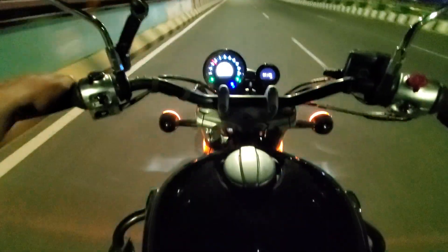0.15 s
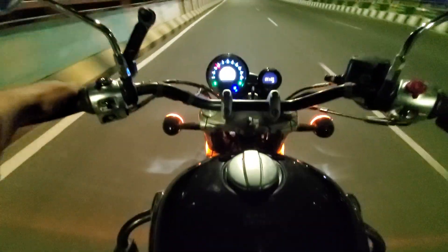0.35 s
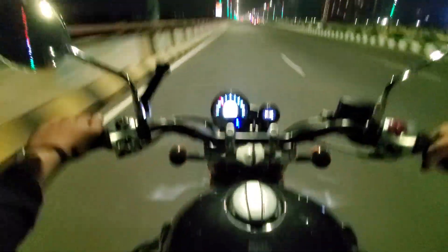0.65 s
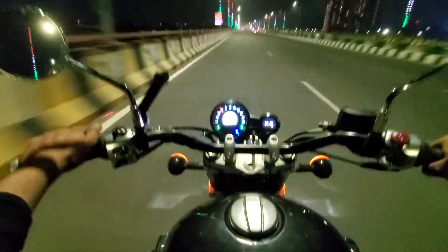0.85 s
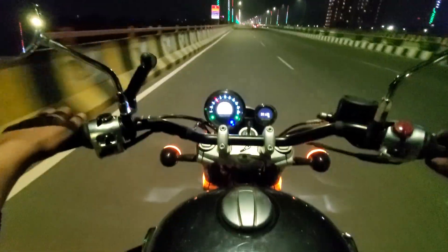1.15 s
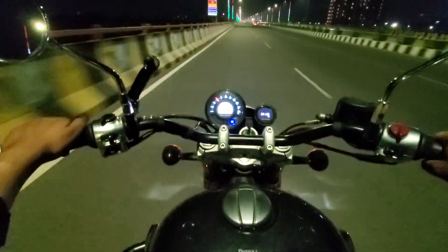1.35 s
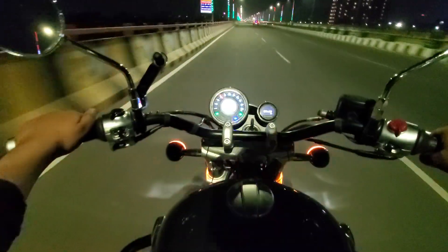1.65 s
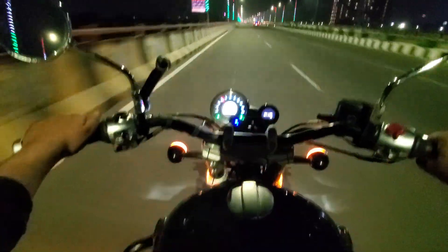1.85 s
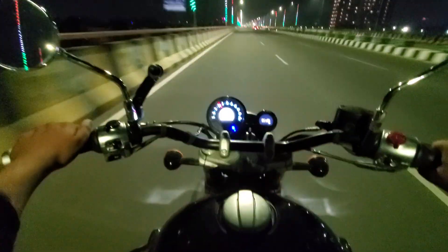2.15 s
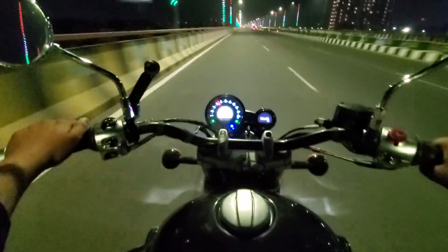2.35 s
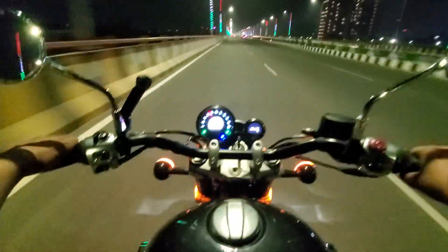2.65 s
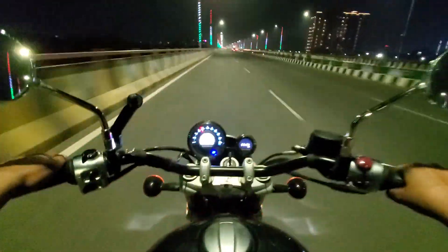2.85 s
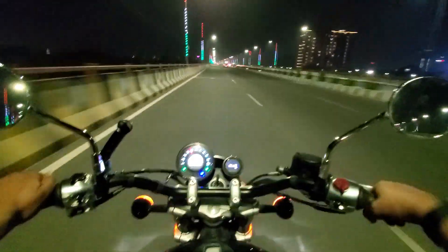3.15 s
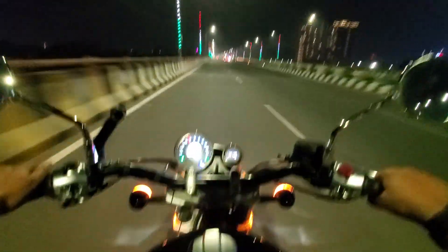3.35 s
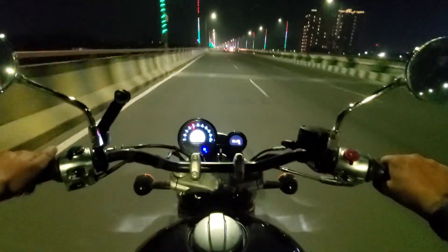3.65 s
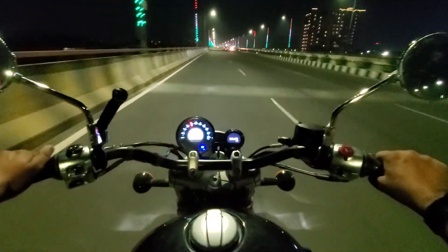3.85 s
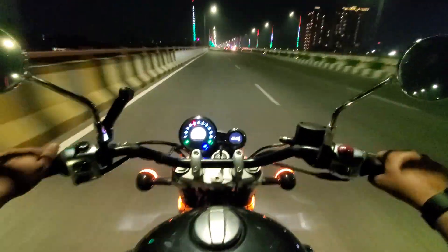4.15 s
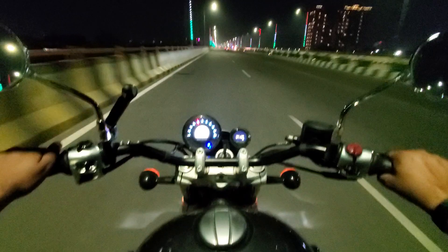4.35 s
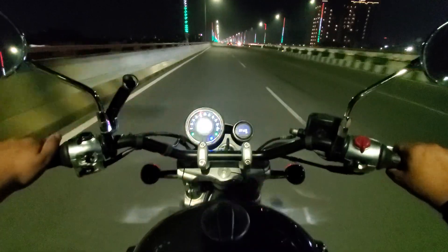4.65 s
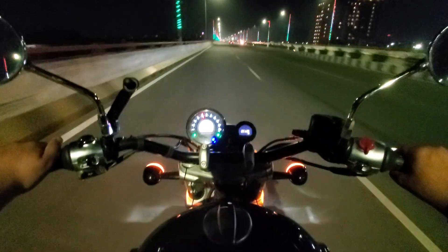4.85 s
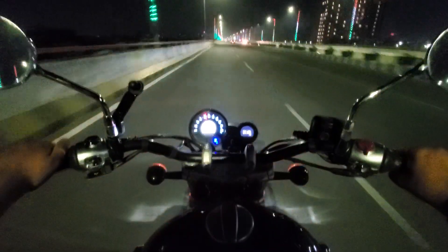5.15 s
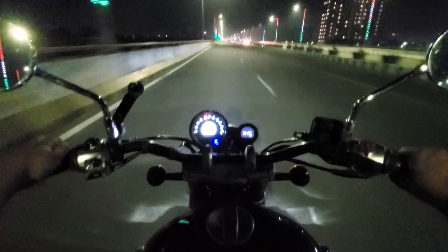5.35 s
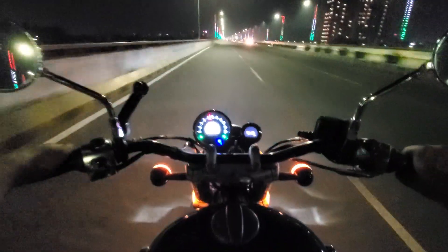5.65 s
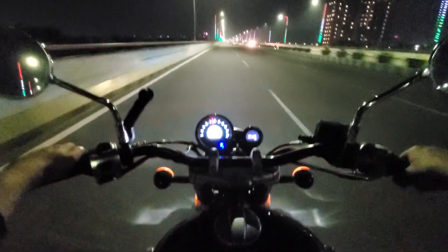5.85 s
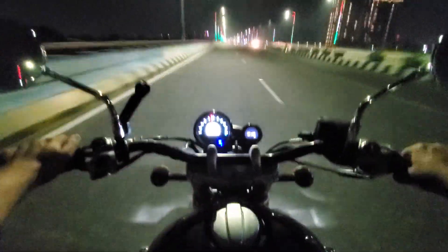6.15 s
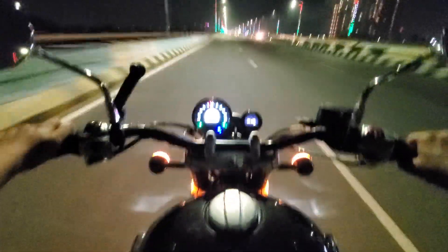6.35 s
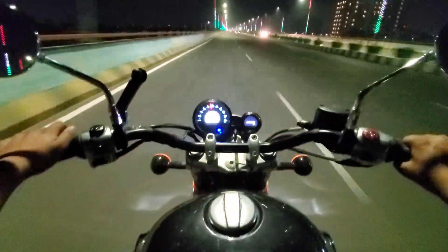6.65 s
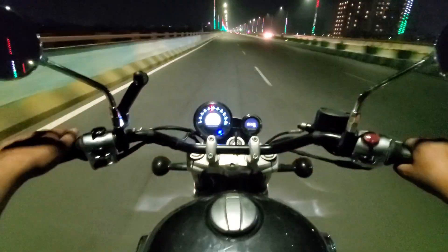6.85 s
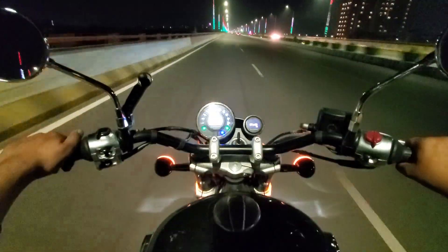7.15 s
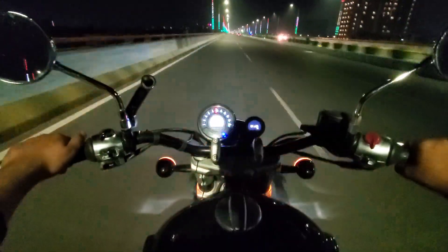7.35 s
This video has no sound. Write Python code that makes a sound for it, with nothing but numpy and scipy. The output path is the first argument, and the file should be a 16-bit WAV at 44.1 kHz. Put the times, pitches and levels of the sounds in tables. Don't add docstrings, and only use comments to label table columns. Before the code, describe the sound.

Hard motorcycle acceleration heard onboard: throaty uneven exhaust drone, three brief throttle cuts with small pops, gear whine and rising wind rumble.

```python
import sys
import numpy as np
from scipy import signal
from scipy.io import wavfile
from scipy.ndimage import uniform_filter1d

SR = 44100
rng = np.random.default_rng(int(sys.argv[2]) if len(sys.argv) > 2 else 0)


def store_pcm(level_fs):
    pcm = np.round(np.clip(level_fs, -1, 1) * 32767).astype(np.int16)
    wavfile.write(sys.argv[1], SR, np.atleast_2d(pcm).T)


def gain_from_db(level_db):
    decades = np.asarray(level_db, float) / 20
    return 10 ** decades


N = 330294


def evened(x):
    return x / np.sqrt(np.mean(x ** 2) + 1e-20)


def in_band(x, lo_hz, hi_hz):
    band_filter = signal.butter(4, [lo_hz, hi_hz], "bandpass", fs=SR, output="sos")
    part = signal.sosfilt(band_filter, x)
    return x / np.sqrt(np.mean(part ** 2))


def curves(rows):
    s, *columns = np.transpose(rows)
    return [np.interp(np.arange(N) / SR, s, c) for c in columns]


def resonate(x, hz, width_hz):
    turn = np.exp(2j * np.pi * np.cumsum(hz * np.ones(len(x))) / SR)
    r = np.exp(-np.pi * width_hz / SR)
    return 2 * (turn * signal.lfilter([1 - r], [1, -r], x / turn)).real


def body(x, modes):
    out = 0
    for k, (hz, width_hz, db) in enumerate(modes):
        ring = resonate(resonate(x, hz, width_hz), hz, width_hz)
        out = out + (-1) ** k * gain_from_db(db) * ring
    return out


def turbulence(shape, patchy_db, gust_db):
    frames, hz = N // 256 + 5, np.fft.rfftfreq(1024, 1 / SR)
    a, b, patches = rng.standard_normal((frames, 513, 3)).T
    patches = uniform_filter1d(patches, size=6, axis=0)
    patches = evened(uniform_filter1d(patches, size=10, axis=1))
    gusts = evened(uniform_filter1d(rng.standard_normal(frames), size=6))
    f, db = np.transpose(shape)
    shape_db = np.interp(np.log(hz + 1), np.log(f), db)[:, None]
    level_db = shape_db + patchy_db * patches + gust_db * gusts
    return signal.istft((a + 1j * b) * gain_from_db(level_db), nperseg=1024, noverlap=768)[1][:N]


# t/s, level/dB
WIND = [(0, -34), (.64, -25), (.8, -25), (2.1, -22.5), (2.6, -19.5), (3.2, -23), (4.2, -15), (6.2, -16.5),
        (7.49, -11)]
# f/Hz, density/dB per Hz
BUFFET = [(20, -45.5), (40, -22.5), (60, -9.5), (100, -0.5), (200, -4.5), (350, -12), (600, -18),
          (1000, -32.5), (2000, -60), (8800, -67.5), (9500, -84.5)]
# f/Hz, density/dB per Hz
ROAR = [(100, -6.5), (300, 0), (620, 5), (1000, 0.5), (1500, -6.5), (2200, -13.5), (2800, -24), (3600, -28),
        (5300, -28.5), (7000, -50), (9000, -62), (11000, -78)]
ROAR_DB, ROAR_SHUT_DB = -33.5, -2
ROAR_WITH_WIND, ROAR_BUILD = 0.24, 0.23


def wind(build_db, shut):
    buffet_db, = curves(WIND)
    roar_db = ROAR_DB + ROAR_SHUT_DB * shut + ROAR_BUILD * build_db
    roar_db += ROAR_WITH_WIND * (buffet_db - buffet_db.mean())
    buffet = in_band(turbulence(BUFFET, patchy_db=1.0, gust_db=.6), 120, 230)
    roar = in_band(turbulence(ROAR, patchy_db=1.2, gust_db=.8), 850, 1300)
    return gain_from_db(buffet_db) * buffet + gain_from_db(roar_db) * roar


# from t/s, to t/s, multiple of cycle f, level/dB, clutch slip/s
MESH = [
    (0.2, 0.69, 17, -34, 0),
    (1.3, 2.9, 17, -33, 0),
    (1.03, 3.0, 20.5, -27.5, .17),
    (3.5, 5.92, 17, -37, 0),
    (3.49, 5.91, 20.5, -31, .06),
    (6.35, 7.49, 17, -32, 0),
    (6.35, 7.5, 24.4, -26, 0),
]
# f/Hz, width/Hz, level/dB
COVER = [(630, 51, 0), (765.6, 60, 5.5), (920, 71, -4)]
TAKE_UP_PER_SLIP_S, TAKE_UP_S = 6, .35


def gear_whine(cycle_hz):
    t, out = np.arange(N) / SR, np.zeros(N)
    waver = 1 + 0.2 * evened(uniform_filter1d(rng.standard_normal(N), size=4000))
    for start, end, multiple, db, slip_s in MESH:
        hz = multiple * np.interp(np.maximum(t, start + slip_s), t, cycle_hz)
        ringing = 0
        for ring_hz, width_hz, ring_db in COVER:
            ringing = ringing + gain_from_db(ring_db) / (1 + (2 * (hz - ring_hz) / width_hz) ** 2)
        ringing = ringing + TAKE_UP_PER_SLIP_S * slip_s * np.exp(-abs(t - start) / TAKE_UP_S)
        loaded = np.clip(np.minimum(t - start, end - t) / 0.022, 0, 1)
        tone = np.sin(2 * np.pi * np.cumsum(hz) / SR)
        out += gain_from_db(db) * ringing * loaded * waver * tone
    return out


# t/s, peak level/dB
POPS = [
    (0.778, -30),
    (0.8403, -35),
    (0.8883, -48.5),
    (1.0268, -26),
    (1.0852, -35.5),
    (3.1983, -44),
    (3.31, -33),
    (6.102, -49),
    (6.227, -41),
    (7.308, -23),
]
# f/Hz, width/Hz, level/dB
CASING = [(1710, 710, 21), (3550, 1900, 7), (4100, 310, 0), (5240, 730, -3.5), (7280, 2500, -8)]


def pops():
    t, drive = np.arange(500) / SR, np.zeros(N)
    envelope = (1 - np.exp(-t / 0.0011)) * np.exp(-t / .003)
    noise = rng.standard_normal((len(POPS), 500))
    for (s, db), puff in zip(POPS, noise):
        drive[round(s * SR):][:500] += gain_from_db(db - 5.5) * puff * envelope
    return gain_from_db(-3) * body(drive, CASING)


# throttle opens t/s, shuts t/s, pull level/dB, easing before shift/dB, silencer f/Hz
GEARS = [
    (-.4, 0.663, 0, -0.5, 283.6),
    (1.006, 3.011, 2.5, -6, 275.3),
    (3.435, 5.894, 0, -4.5, 272.4),
    (6.284, 7.8, -2.5, -8, 274.6),
]
SHUT_DB, CREEP_DB = -32, -17.5
BITE_DB, BUILD, EASE = -5, 0.53, 0.22
ROLL_ON_S, SNAP_S, CLUTCH_S = 0.051, .07, .1


def throttle():
    rows = []
    for opens, shuts, pull_db, ease_db, hz in GEARS:
        span = shuts - opens
        rows += [(opens - ROLL_ON_S, CREEP_DB, BITE_DB, 1, hz),
                 (opens, CREEP_DB, BITE_DB, 0, hz),
                 (opens + CLUTCH_S, pull_db + BITE_DB, BITE_DB, 0, hz),
                 (opens + BUILD * span, pull_db, 0, 0, hz),
                 (shuts - EASE * span, pull_db, 0, 0, hz),
                 (shuts, pull_db + ease_db, 0, 0, hz),
                 (shuts + SNAP_S, SHUT_DB, 0, 1, hz)]
    return curves(rows)


CLATTER_DB, CLATTER_SHUT_DB = -44.5, -8.5
KNOCK_PEAK, KNOCK_SAG_DB, KNOCK_BITE_DB = 0.24, -1.5, -6.5
LIGHT_LOAD_DB = -1.5


def knocking(shut):
    rows = []
    for opens, shuts, *_ in GEARS:
        light_db = LIGHT_LOAD_DB * (opens < 0)
        rows += [(opens, KNOCK_BITE_DB + light_db),
                 (opens + KNOCK_PEAK * (shuts - opens), light_db),
                 (shuts, KNOCK_SAG_DB + light_db)]
    return CLATTER_DB + CLATTER_SHUT_DB * shut + curves(rows)[0]


def firings(cycles, cylinders, uneven_db):
    train = np.zeros(N)
    chance = rng.standard_normal((400, len(cylinders)))
    for k, (place, db) in enumerate(cylinders):
        at = np.flatnonzero(np.diff(np.floor(cycles - place)) > 0)
        train[at] += gain_from_db(db + uneven_db * chance[:len(at), k])
    return train


# place in cycle/0-1, level/dB
BURNS = [(.625, -4), (0.0, 0)]


def clatter(cycles, cycle_hz, level_db):
    t = np.arange(800) / SR
    burst = (t / .0016) ** 2 * np.exp(-t / 0.0014)
    train = firings(cycles + .055, BURNS, uneven_db=2.6)
    shake = evened(signal.oaconvolve(train, burst)[:N]) + .3
    knock = .45 * evened(np.roll(train, 70))
    casing = in_band(body(shake * rng.standard_normal(N) + knock, CASING), 2500, 6000)
    cam_chain = resonate(rng.standard_normal(N), 156 * cycle_hz, 350)
    cam_chain = evened(resonate(cam_chain, 5740, 600))
    fading_db = np.interp(np.arange(N) / SR, [0, 7.49], [-9, -17])
    return gain_from_db(level_db - 4.0) * (casing + gain_from_db(fading_db) * cam_chain)


# place in cycle/0-1, level/dB
BLOWDOWN = [(.02, -5), (.413, 0)]
# f/Hz, width/Hz, level/dB
PIPE = [(194.5, 52, -12.5), (309.4, 24, -11.5), (426, 45, -21), (527, 82, -24.5), (613.3, 72, -17),
        (750, 120, -36.5), (1220, 340, -36.5), (1407, 60, -30.5), (146, 40, -11.5), (488, 40, -32.5),
        (685, 130, -26)]
# f/Hz, width/Hz, level/dB
THUMP = [(69.5, 49, -0.5), (117.1, 30, 1.5)]
PIPE_DB, THUMP_DB = -13.5, -20
BOOM_WIDTH_HZ = 40


def exhaust(cycles, throttle_db, boom_hz):
    pulses = firings(cycles, BLOWDOWN, uneven_db=0.23)
    boom = body(pulses, [(boom_hz, BOOM_WIDTH_HZ, 0)])
    note = evened(boom - body(pulses, PIPE))
    thump = evened(body(firings(cycles, BLOWDOWN, uneven_db=1.0), THUMP))
    return gain_from_db(PIPE_DB + throttle_db) * note + gain_from_db(THUMP_DB + 0.12 * throttle_db) * thump


# t/s, four-stroke cycle f/Hz
SPEED = [(0.0, 33.12), (0.25, 35.24), (0.5, 37.39), (0.67, 37.83), (1.05, 29.11), (1.2, 30.92),
         (1.8, 33.79), (2.65, 37.98), (3.03, 39.42), (3.43, 31.32), (3.55, 33.02), (4.0, 34.26),
         (5.92, 39.92), (6.15, 38.33), (6.45, 35.03), (6.8, 35.37), (7.49, 36.72)]


def scene():
    cycle_hz, = curves(SPEED)
    throttle_db, build_db, shut, boom_hz = throttle()
    cycles = np.cumsum(cycle_hz) / SR + .19
    air = wind(build_db, shut)
    gearbox = gear_whine(cycle_hz)
    casing = pops() + clatter(cycles, cycle_hz, knocking(shut))
    return (air + gearbox + casing + exhaust(cycles, throttle_db, boom_hz))[None]


# f/Hz, level/dB
GATE = [(6200, -96.5), (7200, -84.5), (9000, -87), (11000, -86)]
GATE_WITH_LEVEL = 0.19


def gate(x):
    hz, _, z = signal.stft(x, SR, nperseg=2048, noverlap=1024)
    power = (abs(z) ** 2).sum(1, keepdims=True)
    loud_db = uniform_filter1d(10 * np.log10(power + 1e-9), size=9, axis=2)
    edge_db = np.interp(hz, *np.transpose(GATE), left=-200)[:, None]
    edge_db = edge_db + GATE_WITH_LEVEL * (loud_db - loud_db.mean())
    kept = uniform_filter1d(abs(z), size=2, axis=1) > gain_from_db(edge_db)
    return signal.istft(z * kept, SR, nperseg=2048, noverlap=1024)[1][:, :N]


def low_pass(x):
    return signal.sosfilt(signal.butter(12, 11200, fs=SR, output="sos"), x)


def record(dry):
    cut = signal.sosfilt(signal.butter(3, 55, "highpass", fs=SR, output="sos"), dry)
    power_db = 10 * np.log10(uniform_filter1d(cut ** 2, size=700) + 1e-9)
    over_db = uniform_filter1d(np.maximum(power_db + 15, 0), size=500)
    held = cut / gain_from_db(0.1 * over_db)
    knee, top = .7, 1.03
    over = np.maximum(abs(held) - knee, 0)
    rounded = (top - knee) * np.tanh(over / (top - knee))
    soft = np.sign(held) * (np.minimum(abs(held), knee) + rounded)
    return low_pass(gate(soft))


dry = scene()
out = record(dry)
store_pcm(out)
```